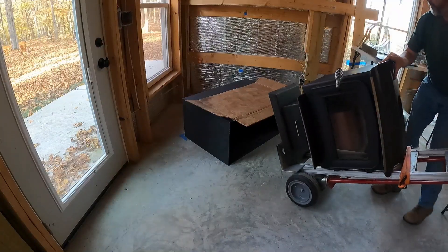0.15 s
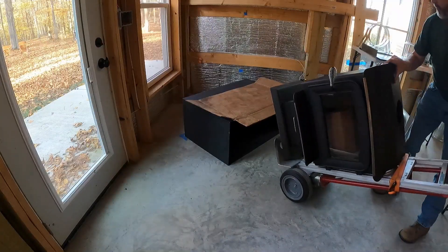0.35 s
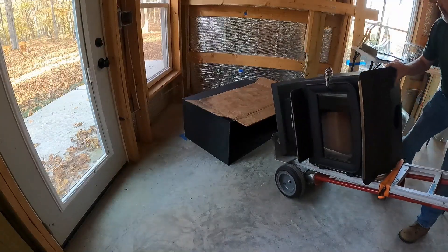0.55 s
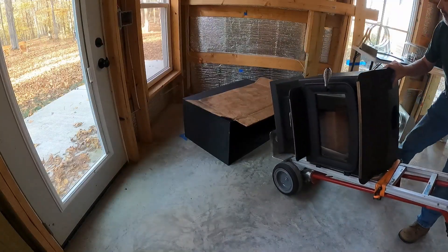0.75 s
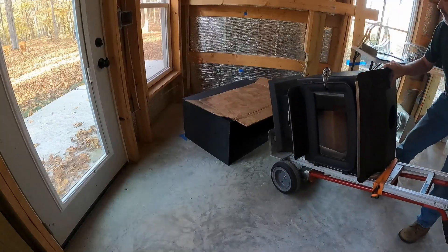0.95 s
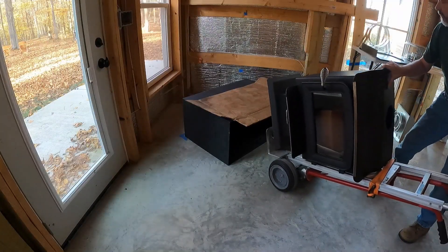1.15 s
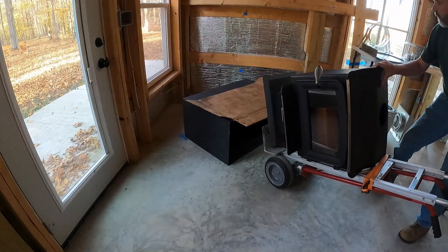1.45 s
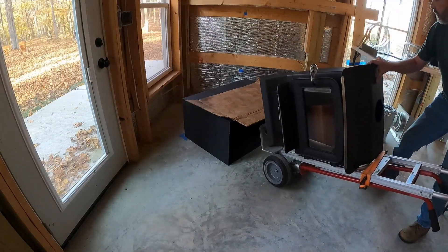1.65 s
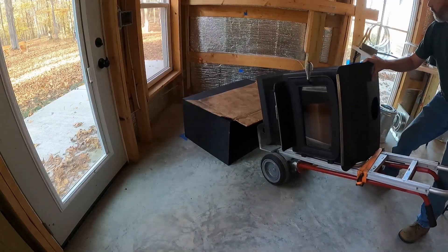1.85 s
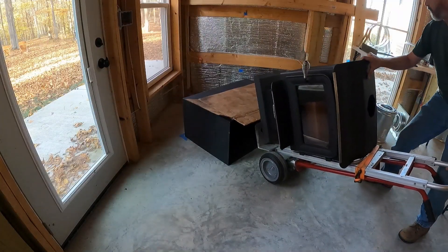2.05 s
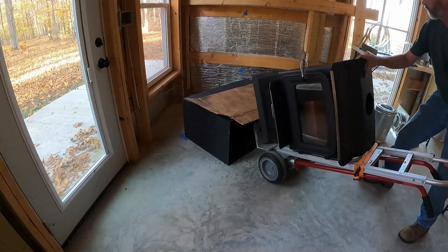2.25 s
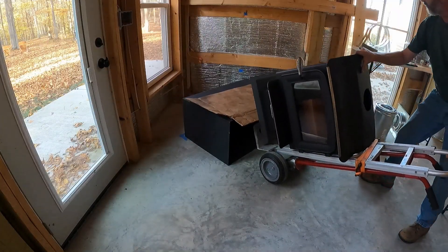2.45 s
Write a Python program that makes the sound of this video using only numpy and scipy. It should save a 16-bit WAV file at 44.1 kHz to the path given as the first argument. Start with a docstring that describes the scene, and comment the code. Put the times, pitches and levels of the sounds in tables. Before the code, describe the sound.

A loaded hand truck scrapes, thuds and clacks in short nudges across a gritty concrete floor

```python
"""Wooden workshop, concrete floor, two close microphone ports: a loaded hand truck is nudged along.
It opens on scraping grit, rumble and thuds, with ticks up to 0.4 s and a hard clack at 0.5 s.
Shorter nudges follow with ticks, thuds and clacks, the hardest near 1.2 s; after a lull, steps and a drag from 2 s.
Scrape is dense grains, rumble is shaped noise, blows ring decaying modes, clacks and ticks add noise cracks.
A hum of steady pitch sinks in level throughout, over a quiet hiss; a diffuse room tail surrounds the truck."""
import sys
import numpy as np
from scipy import signal
from scipy.fft import rfft, irfft
from scipy.io import wavfile
from scipy.ndimage import uniform_filter1d

SR = 44100
rng = np.random.default_rng(int(sys.argv[2]) if len(sys.argv) > 2 else 0)


def dump_mix(stems):
    """Bounce the given channels to the path in sys.argv[1] as a 16-bit WAV at rate SR."""
    frames = np.atleast_2d(stems).T  # one column per channel
    limited = np.clip(frames, -1, 1)  # hard clip at full scale
    pcm = np.round(limited * 32767).astype(np.int16)
    wavfile.write(sys.argv[1], SR, pcm)


def magnitude_from_level(level_db):
    """Linear magnitude for a level in decibels (20 dB per decade)."""
    exponent = np.asarray(level_db, float) / 20
    return 10 ** exponent


N = 114660
T = np.arange(N) / SR


def unit(x):
    """Scale to rms 1."""
    return x / np.sqrt(np.mean(x ** 2))


def across(table, hz):
    """Read (f/Hz, value) points on a log-frequency axis."""
    table = np.array(table, float)
    return np.interp(np.log(hz + 1), np.log(table[:, 0]), table[:, 1])


def colour(x, table):
    """Causal minimum-phase filter with the table's spectrum and unit energy."""
    log_spectrum = np.log(magnitude_from_level(across(table, np.fft.rfftfreq(4096, 1 / SR))))
    cepstrum = irfft(log_spectrum)
    # fold the cepstrum onto positive time: minimum phase
    cepstrum[1:2048] *= 2
    cepstrum[2049:] = 0
    h = irfft(np.exp(rfft(cepstrum)))
    return signal.fftconvolve(x, h / np.sqrt(np.sum(h ** 2)))[:len(x)]


def curve(spans, column=1):
    """Join the points of several spans; between them the level is -120 dB and any other column 0."""
    out = np.full(N, -120. if column == 1 else 0.)
    for rows in spans:
        rows = np.array(rows)
        inside = (T >= rows[0, 0]) & (T <= rows[-1, 0])
        out[inside] = np.interp(T[inside], rows[:, 0], rows[:, column])
    return out


def walk(rate):
    """Smooth random waver, spread near 1, from about `rate` fresh values a second."""
    k = int(SR / rate)
    held = np.repeat(rng.standard_normal(N // k + 1), k)
    return 1.3 * uniform_filter1d(uniform_filter1d(held, k), k)[:N]


def add(out, s, y):
    """Mix y in at s seconds."""
    i = max(int(s * SR), 0)
    out[i:i + len(y)] += y[:N - i]


def tilt(x, lean_db):
    """Lean the colour around 5 kHz: bass down and treble up by lean_db, which may move in time."""
    low = signal.sosfilt(signal.butter(1, 5000, fs=SR, output="sos"), x)
    return low * magnitude_from_level(-lean_db) + (x - low) * magnitude_from_level(lean_db)


def ring(modes, scatter_db):
    """One blow's response: decaying modes, peak 1, with scattered strength and slightly scattered pitch."""
    t = T[:SR // 2]
    y = np.zeros(len(t))
    for hz, db, t60 in modes:
        strength, detune = rng.standard_normal(2)
        tone = np.sin(2 * np.pi * hz * (1 + 0.0031 * detune) * t)
        y += magnitude_from_level(db + scatter_db * strength) * tone * 1000 ** (-t / t60)
    return y / np.abs(y).max()


def soft_blow(modes, db, push_s):
    """A push of finite length sets the modes ringing; a longer push rounds off the treble."""
    push = np.hanning(max(int(push_s * SR), 3))
    return -magnitude_from_level(db) * np.convolve(ring(modes, 2.7), push / push.sum())


def burst(rise_s, table, strike=0):
    """A crack of noise that swells for rise_s, then dies; strike sizes one hard contact at its start."""
    t = T[:SR // 4]
    envelope = t / rise_s * np.exp(1 - t / rise_s)
    noise = rng.standard_normal(len(t)) * envelope
    return colour(noise + strike * (t == 0), table) / 2.46


# colour of the quiet hiss: f/Hz, relative level/dB per Hz
AIR_COLOUR = [(25, -16.5), (50, -12.5), (100, -11), (221, -12.5), (460, -39.5), (1220, -41), (3500, -53),
              (7050, -46.5), (12200, -60), (14000, -85)]


def air():
    """Quiet hiss: shaped noise whose level wavers slowly."""
    level_db = -43 + 2.2 * walk(5.32)
    return unit(colour(rng.standard_normal(N), AIR_COLOUR)) * magnitude_from_level(level_db)


# motor partials: multiple of the pitch, relative level/dB rms
HUM_PARTIALS = [(1, 0), (2, -4)]
# hum level: t/s, level/dB
HUM_FADE = [(0, -24.5), (.6, -32.5), (1.9, -35), (2.6, -38.5)]


def hum():
    """Motor hum: steady partials of one pitch, each wavering a little in level."""
    pitch_hz, waver_db = 68.3, 0.5
    y = np.zeros(N)
    for multiple, db in HUM_PARTIALS:
        tone = np.sqrt(2) * np.sin(2 * np.pi * (multiple * pitch_hz * T + rng.random()))
        y += magnitude_from_level(db + waver_db * walk(10.63)) * tone
    return y * magnitude_from_level(curve([HUM_FADE]))


def room(x):
    """Workshop reverberation: one diffuse tail after a short gap; the treble dies sooner than the bass."""
    t60_s, treble_t60_s, level_db, gap_s = 0.41, 0.23, -2.5, 0.00227
    t = T[:SR]
    noise = rng.standard_normal(SR)
    low = signal.sosfilt(signal.butter(1, 3000, fs=SR, output="sos"), noise)
    tail = low * 1000 ** (-t / t60_s) + (noise - low) * 1000 ** (-t / treble_t60_s)
    h = tail * (t > gap_s)
    return signal.fftconvolve(x, h / np.sqrt(np.sum(h ** 2)))[:N] * magnitude_from_level(level_db)


# colour of the rolling load: f/Hz, relative level/dB
RUMBLE_COLOUR = [(25, -22), (48, 0.5), (100, -4.5), (300, -1), (450, -13.5), (800, -25), (2000, -68)]
# rolling, one span per nudge: t/s, level/dB before flutter
RUMBLE = [
    [(0, -21), (.28, -43), (.36, -27), (.49, -36), (.55, -38.5), (.78, -51.5)],
    [(.81, -29.5), (.85, -26.5), (.95, -40), (1.1, -54.5)],
    [(1.985, -65), (2.01, -34.5), (2.12, -37.5), (2.33, -41.5), (2.44, -36.5), (2.6, -55)],
]


def rumble():
    """Tyres over the uneven slab shake the load: low shaped noise with a fluttering level."""
    level_db = curve(RUMBLE) + 2.5 * walk(50)
    return unit(colour(rng.standard_normal(N), RUMBLE_COLOUR)) * magnitude_from_level(level_db)


# modes of the concrete slab: f/Hz, relative level/dB before scatter, t60/s
SLAB = [(98.2, 0, 0.71), (299.7, -5.5, 0.43)]
# steps on the slab: t/s, level/dB, push length/s
STEPS = [(1.995, -23, .0015), (2.088, -38, 0.00068)]


def steps():
    """Steps ring the slab's low modes through a short push."""
    out = np.zeros(N)
    for s, db, push_s in STEPS:
        add(out, s, soft_blow(SLAB, db, push_s))
    return out


# modes of the load: f/Hz, relative level/dB before scatter, t60/s
LOAD = [(140.1, -1, 0.2), (199, 0, 0.22), (315, -6.5, 0.052), (424, -6.5, 0.17), (608, -3.5, 0.075)]
# thuds of the load: t/s, level/dB, push length/s
THUDS = [(.001, -11, 0.00066), (.024, -12, 0.00084), (.061, -14, 0.002), (.182, -17.5, .0018),
         (.312, -12, 0.0026), (.357, -13, 0.0023), (.406, -21, 0.0017), (.812, -17, 0.0013),
         (.826, -12, 0.0024), (.8345, -10, .001), (.848, -13.5, 0.0019), (2.385, -26, 0.0014),
         (2.444, -28.5, 0.0019)]


def thuds():
    """Jolts ring the load's modes through a short push."""
    out = np.zeros(N)
    for s, db, push_s in THUDS:
        add(out, s, soft_blow(LOAD, db, push_s))
    return out


# light metal ticks: t/s, approximate peak level/dB, centre f/Hz
TICKS = [(.177, -16, 1280), (0.2688, -16.5, 2040), (.311, -17, 1560), (.324, -11, 1270),
         (0.3557, -12.5, 2160), (.371, -11.5, 950), (0.779, -26, 3900), (0.8109, -14, 1280),
         (.834, -15, 2400), (.848, -15.5, 1220), (0.888, -31, 2530), (.989, -20, 1530), (1.030, -25, 1540),
         (1.072, -44, 1620)]


def ticks():
    """Metal ticks: one hard contact and a very short crack, coloured around each tick's own pitch."""
    rise_s, octaves, skirt_db = .0011, 1.05, -11
    wide = 2 ** octaves
    out = np.zeros(N)
    for s, db, hz in TICKS:
        shape = [(250, -40), (hz / wide, skirt_db), (hz, 0), (hz * wide, skirt_db), (15000, -55)]
        add(out, s, magnitude_from_level(db) * burst(rise_s, shape, strike=6.6))
    return out


# colour of a clack's crack: f/Hz, relative level/dB
CRACK = [(500, -49), (800, -18), (1270, -6), (1950, -7.5), (4760, -4), (8000, -13.5), (12100, -25),
         (16500, -45)]
# modes of the metal frame: f/Hz, relative level/dB before scatter, t60/s
FRAME = [(1250, -3, .12), (1744, -5, .12), (2896, -1, .14), (4748, -2, .12), (7600, -9, .05)]
# clacks: t/s, approximate peak level/dB of the crack, its rise time/s
CLACKS = [(.508, -4.5, 0.0038), (0.627, -15, 0.005), (0.743, -31, 0.0028), (0.944, -25.5, 0.0015),
          (1.156, -20, 0.0083), (1.1849, -6.5, 0.0044), (1.7844, -42.5, 0.005)]


def clacks():
    """Metal parts clack: a crack of noise and, 11 dB below its listed level, the ringing frame."""
    out = np.zeros(N)
    for s, db, rise_s in CLACKS:
        add(out, s, magnitude_from_level(db) * burst(rise_s, CRACK))
        add(out, s, magnitude_from_level(db - 11) * ring(FRAME, 2.4))
    return out


# colour of the grit before tilting: f/Hz, relative level/dB
GRIT = [(250, -25), (530, -0.5), (750, -7.5), (1600, -0.5), (3270, -7), (4500, -5), (8000, -15),
        (12500, -27.5), (16000, -36)]
# scraping, one span per drag: t/s, level/dB before tilt and flutter, tilt/dB (positive is brighter)
SCRAPE = [
    [(0, -24, 1.5), (.045, -16, 0.5), (.07, -27, -1.5), (.13, -50, 8), (.182, -28, 9.5), (.24, -40.5, -5),
     (.30, -47, -12.5), (.32, -34, 9), (.5, -44, -10.5)],
    [(.66, -41, -1.5), (.80, -48, 1.5), (.85, -46.5, -8.5), (.93, -57, -12.5), (1.07, -54.5, -7.5),
     (1.10, -87, 10)],
    [(1.2, -41, -6.5), (1.56, -70.5, 0.5)],
    [(1.79, -53, -5), (1.88, -70.5, 19), (1.895, -76, 24), (1.985, -55.5, -1.5), (2.005, -28, 1.5),
     (2.10, -28, 0.5), (2.18, -32, 4), (2.20, -28, -1), (2.30, -31.5, 5.5), (2.37, -40.5, -0.5),
     (2.45, -47, 0.5), (2.6, -49.5, 7)],
]


def scrape():
    """Grit crushed and dragged under tyres and boots: dense random grains, fluttering in level and treble."""
    grains_per_s, spread_db, flutter_db = 11000, 1.9, 1.2
    hits = rng.random(N) < grains_per_s / SR
    sizes = rng.choice([-1, 1], N) * magnitude_from_level(spread_db * rng.exponential(size=N))
    grit = unit(colour(hits * sizes, GRIT))
    lean_db = curve(SCRAPE, column=2) + flutter_db * walk(30.14)
    level_db = curve(SCRAPE) + flutter_db * walk(90)
    return tilt(grit, lean_db) * magnitude_from_level(level_db)


# stereo width: f/Hz, gain of the side signal/dB
WIDTH = [(60, -13), (250, -8.5), (2200, -15.5), (12000, -7.5)]


def scene():
    """The truck and hum sit in the middle; the room and the hiss differ between the channels."""
    bright = clacks() + ticks() + scrape()
    low = thuds() + steps() + rumble()
    send = bright + magnitude_from_level(-14) * low  # the bass excites the room less
    mid = bright + low + room(send) + hum() + air()
    spread = np.sqrt(2) * room(send) + air()  # a second, independent tail and hiss
    side = irfft(rfft(spread) * magnitude_from_level(across(WIDTH, np.fft.rfftfreq(N, 1 / SR))), N)
    return np.array([mid + side, mid - side])


def top_cut(x):
    """Nothing passes above the cut-off."""
    return signal.sosfilt(signal.butter(12, 13390, fs=SR, output="sos"), x)


# phase between the microphone ports: f/Hz, lead of the left port/radians
LEAD = [(500, 0.015), (2500, -1.01), (11400, 0.23)]


def record(dry):
    """Two close microphone ports: each takes half of the phase shift between the channels."""
    turn = np.exp(.5j * across(LEAD, np.fft.rfftfreq(N, 1 / SR)))
    left = irfft(rfft(dry[0]) * turn, N)
    right = irfft(rfft(dry[1]) / turn, N)
    return top_cut(np.array([left, right]))


dry = scene()
out = record(dry)
dump_mix(out)
```